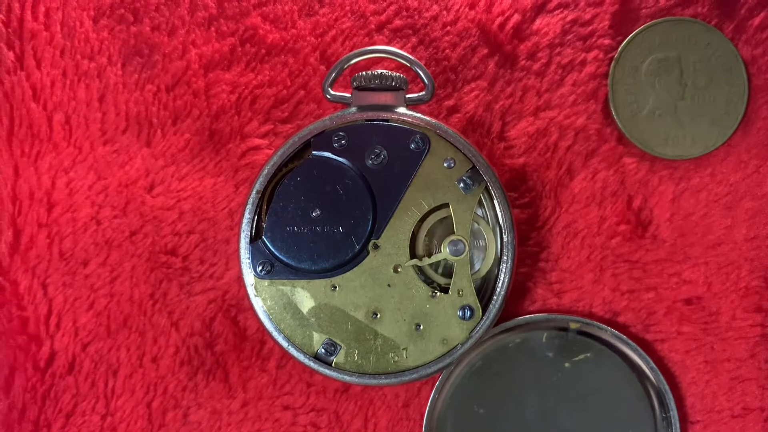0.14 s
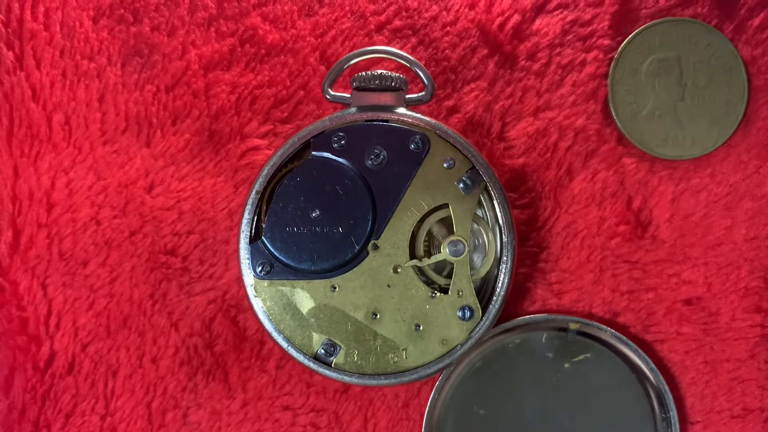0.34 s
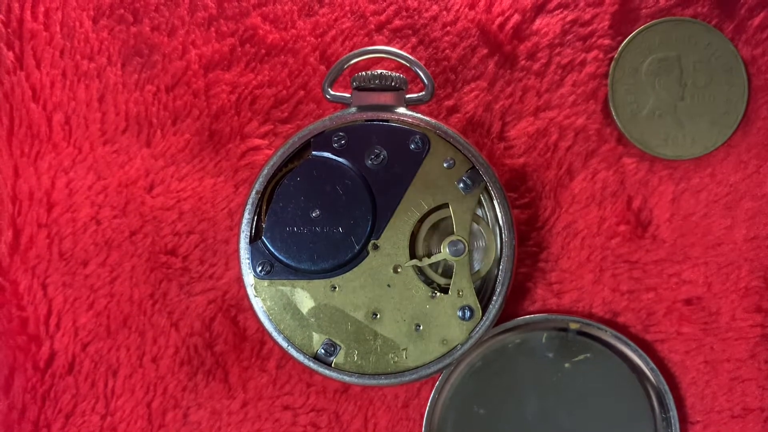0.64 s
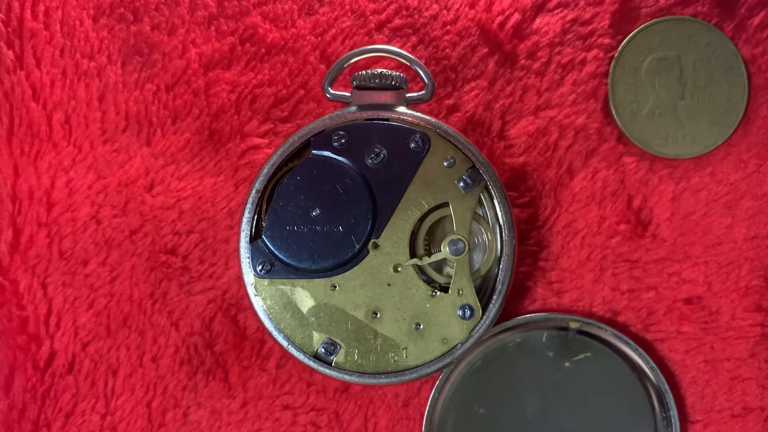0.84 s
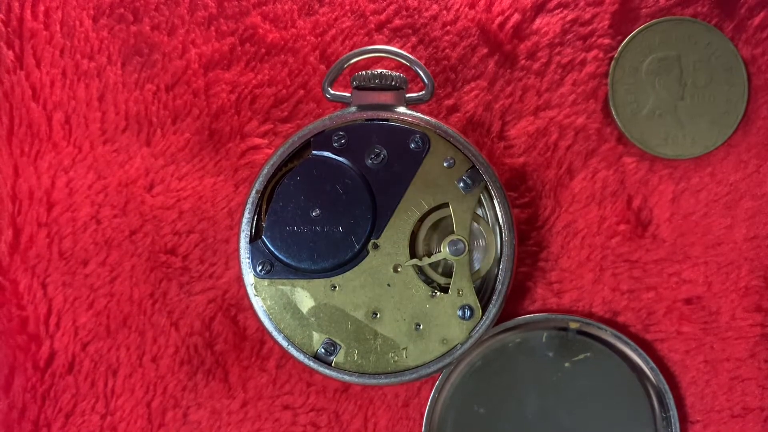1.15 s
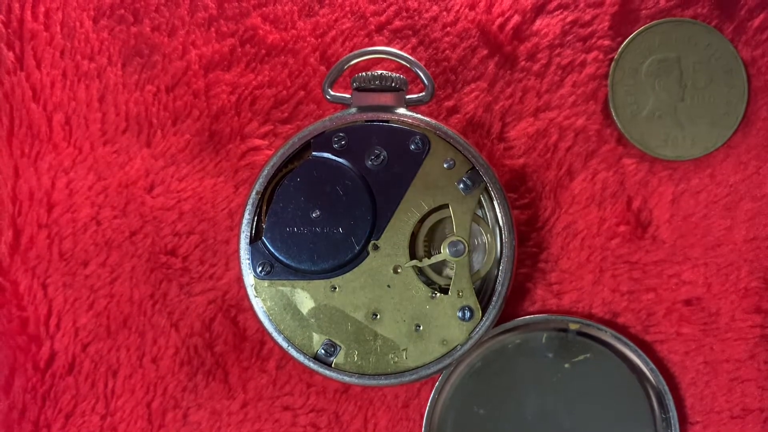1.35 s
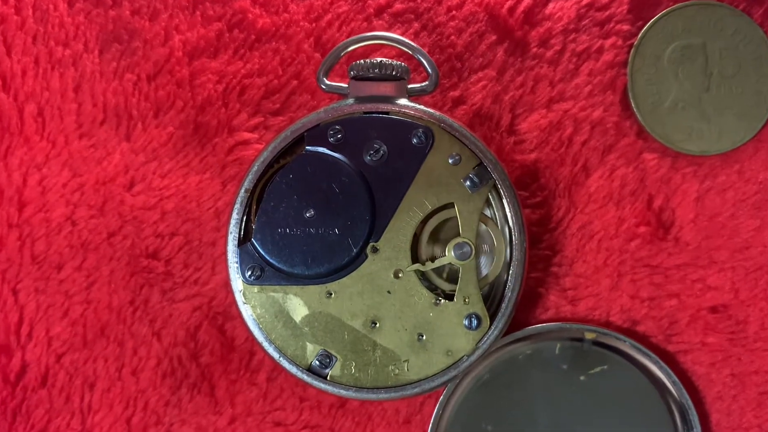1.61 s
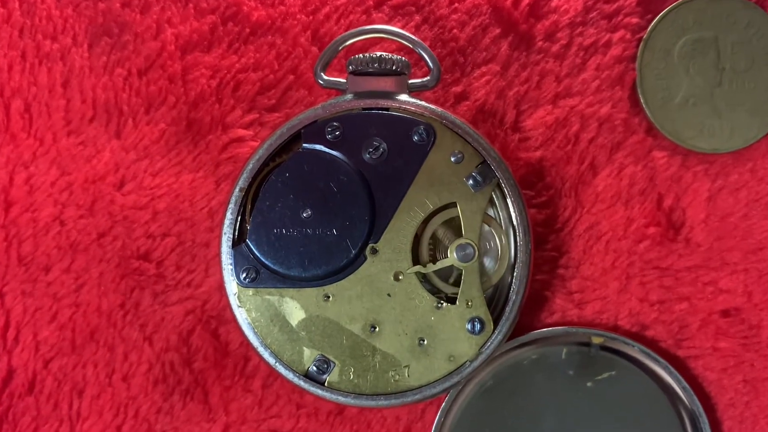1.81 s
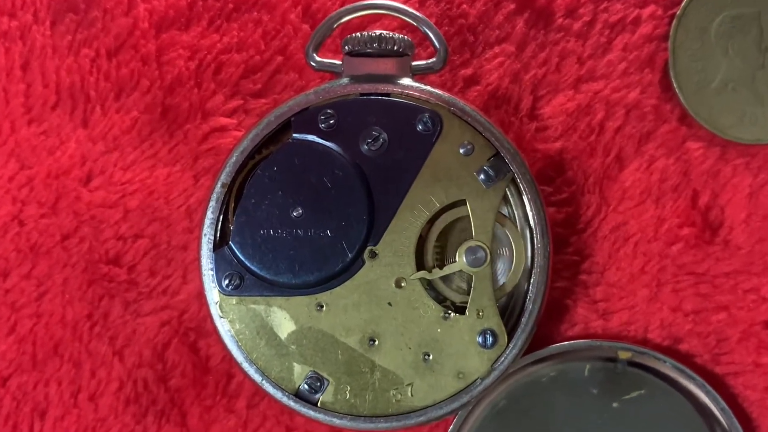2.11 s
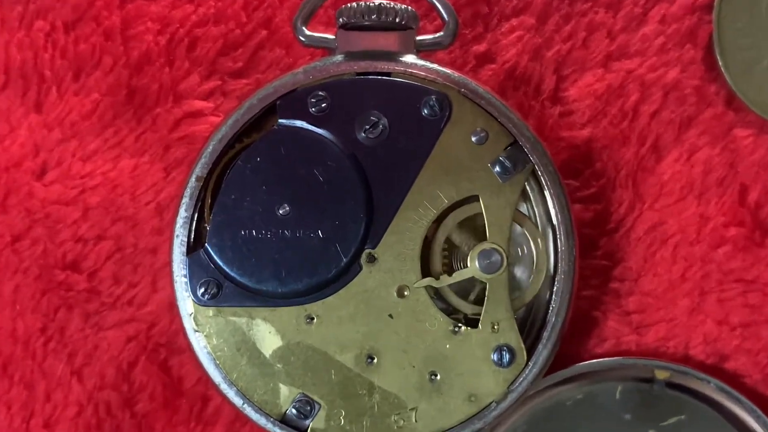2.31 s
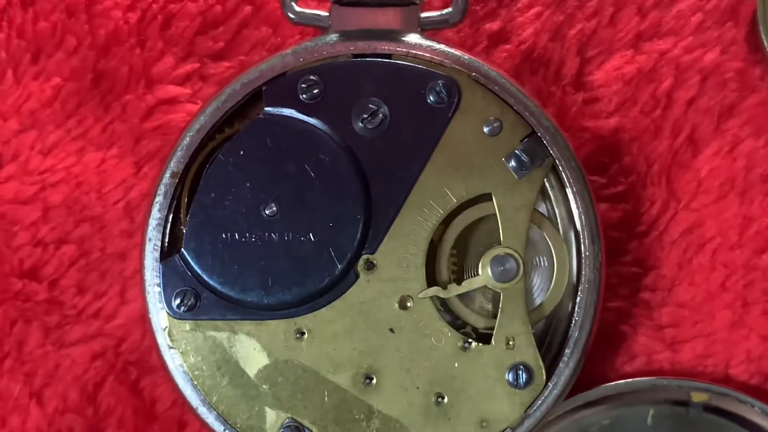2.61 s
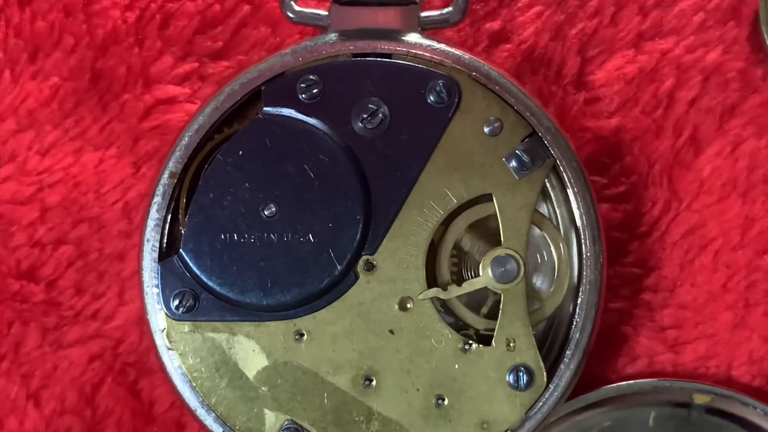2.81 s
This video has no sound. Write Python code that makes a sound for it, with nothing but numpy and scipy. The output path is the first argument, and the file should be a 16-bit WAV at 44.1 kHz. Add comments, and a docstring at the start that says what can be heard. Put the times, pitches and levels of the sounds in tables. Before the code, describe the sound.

Fast, tiny metallic tick-tock of a pocket watch movement, with faint hiss and distant engines behind

```python
"""An open pocket watch on plush cloth, heard close: impacts in its escapement ring steel modes, tick-tock,
four beats a second, with fainter contacts around each beat and a hairspring ping before each tock.
Behind it, filtered noise makes the room's hiss and a low traffic rumble; sines make an appliance hum,
swelling tones of distant traffic, an engine that speeds up and another that passes with falling pitch."""
import sys
import numpy as np
from scipy import signal
from scipy.fft import rfft, irfft, next_fast_len
from scipy.io import wavfile
from scipy.ndimage import uniform_filter1d, map_coordinates

SR = 44100
rng = np.random.default_rng(int(sys.argv[2]) if len(sys.argv) > 2 else 0)


def unload_audio(sound):
    """Save the sound as a 16-bit wav file, at the path given as the first command line argument."""
    columns = np.transpose(np.atleast_2d(sound))
    # keep every value between -1 and 1, then stretch to whole-number steps
    steps = np.round(np.clip(columns, -1, 1) * 32767)
    wavfile.write(sys.argv[1], SR, steps.astype(np.int16))


N = 130536
SWING_S = 0.5008  # one full swing of the balance: a tick and a tock


def amp(db):
    """Decibel law: level to amplitude ratio."""
    return 10 ** (np.asarray(db) / 20)


def unit(x):
    """Normalisation to a root-mean-square value of 1."""
    return x / np.sqrt(np.mean(x ** 2) + 1e-20)


def along(points, hz):
    """Interpolation of (frequency, value) points on a logarithmic frequency axis."""
    f, v = np.transpose(points)
    return np.interp(np.log(hz + 1), np.log(f + 1), v)


def curves(rows):
    """Linear interpolation in time: one value per sample for each column after the first."""
    s, *columns = np.transpose(rows)
    return [np.interp(np.arange(N) / SR, s, column) for column in columns]


def wobble(rate):
    """Slow random modulation: a smooth curve through `rate` random knots a second."""
    knots = rng.standard_normal(int(N * rate / SR) + 4)
    return map_coordinates(knots, [np.arange(N) * rate / SR])


def filtered(x, response):
    """Linear filtering: the spectrum times a complex response of frequency."""
    m = next_fast_len(N + SR // 2)
    return irfft(rfft(x, m) * response(np.fft.rfftfreq(m, 1 / SR)), m)[..., :N]


def tone(hz, waver_db):
    """Frequency modulation: phase is the integral of frequency; the level of the sine wavers about rms 1."""
    cycles = np.cumsum(hz + np.zeros(N)) / SR + rng.random()
    return np.sqrt(2) * amp(waver_db * wobble(7.38)) * np.sin(2 * np.pi * cycles)


def add(track, s, sound):
    """Superposition: a stereo sound joins the track at time s."""
    i = round(s * SR)
    if 0 <= i < N:
        track[:, i:i + sound.shape[1]] += sound[:, :N - i]


# likeness of the two channels of the noise: f/Hz, correlation [0-1]
LIKENESS = [(60, 0.9), (270, 0.79), (450, 0.41), (2000, 0.18), (5500, 0.067), (9300, 0.038), (11000, 1),
            (13500, 0.99), (15000, 0.67)]
# balance of the two channels of the noise: f/Hz, left over right level/dB
BALANCE = [(60, 1), (140, 1.5), (300, -1.5), (500, -2.5), (770, 2), (1170, -1), (2740, -1.5), (5500, 1.5),
           (7500, 1.5), (8300, 12), (9300, 6.5), (10400, 2.5), (15000, -1)]


def diffuse_noise(spectrum, patchy_db, size):
    """Partial coherence: mid and side noises share the power by the channels' correlation; overall rms is 1."""
    z = signal.stft(rng.standard_normal((2, N)), nperseg=size)[2]
    # a smoothed random gain over frequency and time makes the noise patchy
    field = rng.standard_normal(z.shape[1:])
    field = uniform_filter1d(field, size=3, axis=0)
    field = uniform_filter1d(field, size=3, axis=1)
    noise = signal.istft(z * amp(patchy_db * unit(field)), nperseg=size)[1][:, :N]

    def mid_side_response(hz):
        angle = np.arccos(np.clip(along(LIKENESS, hz), -1, 1)) / 2
        return amp(along(spectrum, hz)) * [np.cos(angle), np.sin(angle)]

    mid, side = filtered(noise, mid_side_response)
    left_right = np.array([mid + side, mid - side])
    return unit(filtered(left_right, lambda hz: amp(np.outer([.5, -.5], along(BALANCE, hz)))))


# shape of the hiss spectrum: f/Hz, relative level/dB per Hz
HISS_SPECTRUM = [(240, -10), (400, -2), (482, -3), (792, -1.5), (1020, -9), (1360, -3.5), (1590, -5.5),
                 (1770, -3), (3250, -8), (4570, -10.5), (5430, -14.5), (6240, -10.5), (7170, -18),
                 (8380, -13), (10500, -17), (13500, -17), (14500, -21.5), (15700, -20), (15800, -43),
                 (16400, -76)]
HISS_DB = -58  # before the swell and the wavering
SWELL_AFTER_S, SWELL_WIDTH_S, SWELL_DB = 0.245, 0.04, 2.2  # time after the tick, width, height


def hiss():
    """Broadband noise under periodic amplitude modulation: the room's hiss swells a little around each tock."""
    from_swell = np.arange(N) / SR - TICKS[0][0] - SWELL_AFTER_S
    from_swell = (from_swell + SWING_S / 2) % SWING_S - SWING_S / 2
    swell_db = SWELL_DB * np.exp(-(from_swell / SWELL_WIDTH_S) ** 2)
    level_db = HISS_DB + swell_db + 0.85 * wobble(5.76)
    return amp(level_db) * diffuse_noise(HISS_SPECTRUM, patchy_db=2.04, size=512)


# shape of the traffic rumble's spectrum: f/Hz, relative level/dB per Hz
RUMBLE_SPECTRUM = [(15, -27), (30, -19), (70, -4), (105, -2), (135, -2.5), (160, -6.5), (200, -6.5),
                   (260, -7), (339, -14), (404, -13.5), (500, -38), (1100, -120)]
# its course before wavering: t/s, level/dB
RUMBLE_COURSE = [(0, -55.5), (.5, -56), (.9, -55), (1.3, -58), (1.8, -59.5), (2.3, -57), (2.96, -57.5)]


def rumble():
    """Low-frequency noise under slow amplitude modulation: traffic that comes and goes."""
    level_db, = curves(RUMBLE_COURSE)
    level_db = level_db + 2.4 * wobble(4.73)
    return amp(level_db) * diffuse_noise(RUMBLE_SPECTRUM, patchy_db=2.5, size=8192)


# appliance hum before wavering and channel balance: f/Hz, rms level/dB
HUM_TONES = [(48.4, -66), (112.3, -58), (120.02, -60.5)]
IN_STEP_S = 0.157  # all hum phases are zero here, so the two upper tones swell together


def hum():
    """Beating: steady sines close in frequency drift in and out of step, each wavering in level."""
    t = np.arange(N) / SR - IN_STEP_S
    out = np.zeros(N)
    for hz, db in HUM_TONES:
        out += np.sqrt(2) * amp(db + 2.3 * wobble(2.98)) * np.sin(2 * np.pi * hz * t)
    return out


# low tones of distant traffic, before wavering and balance: middle t/s, half length t/s, f/Hz, rms level/dB
TRAFFIC_TONES = [(0.07, 0.12, 247, -61.5), (0.29, 0.46, 186.3, -64), (.5, 0.11, 134, -64.5),
                 (0.64, 0.26, 268.2, -65), (0.865, 0.19, 138, -61), (0.952, 0.125, 210, -62),
                 (0.99, 0.21, 105.9, -59), (2.31, 0.27, 262.5, -65), (2.796, 0.25, 249.3, -64.5),
                 (2.804, 0.24, 186.4, -66)]


def moans():
    """Gaussian envelope: each tone swells and fades smoothly."""
    t = np.arange(N) / SR
    out = np.zeros(N)
    for middle_s, half_s, hz, db in TRAFFIC_TONES:
        out += amp(db) * np.exp(-((t - middle_s) / half_s) ** 2) * tone(hz, waver_db=1.5)
    return out


# course of the passing engine's lower tone, before wavering and balance: t/s, f/Hz, level/dB
PASSING_COURSE = [(1.0, 88.7, -75), (1.3, 90.7, -57.5), (1.5, 86.92, -58), (1.9, 79.8, -58),
                  (2.15, 76.7, -55), (2.4, 74.4, -87)]


def passing_engine():
    """Frequency glide: two tones in a fixed ratio fall together as the engine passes."""
    hz, db = curves(PASSING_COURSE)
    upper = amp(-0.5) * tone(1.33 * hz, waver_db=2.5)
    return amp(db) * (tone(hz, waver_db=0.5) + upper)


# course of the nearing pitch and level, before orders, wavering and balance: t/s, firing f/Hz, level/dB
ENGINE_COURSE = [(1.1, 55, -67), (1.45, 57.26, -55), (1.599, 57.13, -59.5), (1.9, 56.8, -56.5),
                 (2.39, 59.65, -58), (2.55, 59.98, -49), (2.96, 62.7, -42.5)]
# engine orders: multiple of the firing frequency, relative level/dB
ORDERS = [(1, 0), (1.5, -14), (2.5, -16)]


def speeding_engine():
    """Engine orders: tones at fixed multiples of a firing frequency that rises overall and swells."""
    start_s, start_hz, _ = ENGINE_COURSE[0]
    fade_in = (start_s - 0.3, start_hz, -80)
    hz, db = curves([fade_in] + list(ENGINE_COURSE))
    return amp(db) * sum(amp(order_db) * tone(k * hz, waver_db=1.0) for k, order_db in ORDERS)


def drones():
    """Amplitude panning: all tonal background sounds share one balance, stronger on the left."""
    mono = hum() + moans() + passing_engine() + speeding_engine()
    return mono * amp([[1.4], [-1.4]])


# hairspring modes: f/Hz, relative level/dB, 60 dB decay t/s
SPRING_MODES = [(4900, 0, .021), (6200, 3, .012)]
# scale of the ping in each swing, in order: level/dB
PING_LEVELS = [-37, -34.5, -34, -34.5, -34.5, -34.5]
PING_AFTER_S, PING_RISE_S = 0.1915, 0.003  # start after the tick, time constant of the rise


def hairspring():
    """Modal decay: the spring's two modes swell quickly and die, before each tock."""
    out = np.zeros((2, N))
    t = np.arange(SR // 20) / SR
    rise = (1 - np.exp(-t / PING_RISE_S)) ** 2
    for (tick_s, _), ping_db in zip(TICKS, PING_LEVELS):
        ring = sum(amp(db - 60 * t / t60) * np.sin(2 * np.pi * (hz * t + rng.random()))
                   for hz, db, t60 in SPRING_MODES)
        add(out, tick_s + PING_AFTER_S, amp(ping_db) * np.tile(ring * rise, (2, 1)))
    return out


def decay(t, db, t60_s):
    """Exponential decay: falls 60 dB in t60_s; its total energy is set by db."""
    return amp(db - 60 * t / t60_s) / np.linalg.norm(amp(-60 * t / t60_s))


def strike(hz, db, t60, length_s):
    """Modal excitation: a chatter of steel on steel rings the modes; case, table and room answer diffusely."""
    t = np.arange(SR // 40) / SR
    phase = 2 * np.pi * (hz[:, None] * t + rng.random((len(hz), 1)))
    rise = 1 - np.exp(-t / 0.0004)  # time constant in s
    rings = amp(db[:, None] - 60 * t / t60[:, None]) * np.sin(phase) * rise
    u = np.clip(t[:SR // 70] / length_s, 0, 1)
    chatter = rng.standard_normal((1, len(u))) * np.sin(np.pi * u) ** 2
    rung = signal.fftconvolve(rings, chatter, axes=1)
    # each mode keeps the energy it had before the chatter
    gain = np.linalg.norm(rings, axis=1) / np.linalg.norm(rung, axis=1)
    direct = np.sum(rung * gain[:, None], axis=0)

    t = np.arange(SR // 5) / SR
    envelope = np.hypot(decay(t, -9, 0.04), decay(t, -5, 0.17))  # early echo and room tail
    response = rng.standard_normal((2, len(t))) * envelope
    response[:, 0] = amp([0.4, -0.4])  # direct sound, 0.8 dB stronger on the left
    return signal.fftconvolve(direct[None], response, axes=1)


# frequencies of the five mode regions: f/Hz
REGIONS = [4000, 5000, 6200, 8500, 12500]
# fainter contacts of one swing, before scatter and a common trim: t/s after the tick, length t/s,
# then relative level/dB of the modes in each of the five regions
SWING_CONTACTS = [(-.060, .003, -35, -9, -25, -13.5, -9.5), (-.0275, 0.0035, -10, -7, -22, -21, -8),
                  (-.008, 0.0047, -7.5, -28, -14, -12, -29), (.008, 0.012, -21, -11, -9, -15, -4.5),
                  (.022, .014, -35, -24, -16, -11, -6), (.044, .005, -28, -3, -22, -16, -3.5),
                  (.064, 0.013, -25, -21, -11, -17, -5), (.080, 0.022, -26, -24, -22, -14, -4),
                  (.096, .0045, -33, -28, -27, -15, -4), (.132, 0.0094, -32, -26, -6.5, -14, -13),
                  (.218, 0.012, -13, -11, -11, -13, -24), (.255, 0.0093, -9, -9, -12, -14, -6),
                  (.269, 0.016, -24, -18, -27, -26, -6), (.298, 0.0082, -23, -6, -12, -15, -0.5),
                  (.345, .0067, -28, -30, -28, -18, -2.5)]


def contacts():
    """Repeated weak impacts: every swing brings the same contacts, scattered in time, level and colour."""
    out = np.zeros((2, N))
    hz, tick_db, tock_db, t60 = np.transpose(MODES)
    level_db = np.mean(TICKS, 0)[1] + BEAT_DB
    tick_times = [s for s, _ in TICKS]
    # swings just outside the scene also reach into it
    for tick_s in tick_times + [tick_times[-1] + SWING_S, tick_times[0] - SWING_S]:
        for after_s, length_s, *region_db in SWING_CONTACTS:
            colour_db = (tick_db + tock_db) / 2 + along(list(zip(REGIONS, region_db)), hz)
            colour_db = colour_db + rng.normal(0, 3.4, len(hz))
            gain = amp(level_db - 1.0 + rng.normal(0, 2.7))
            start_s = tick_s + after_s + rng.normal(0, 0.001)
            add(out, start_s, gain * strike(hz, colour_db, t60, length_s))
    return out


# modes of the movement: f/Hz, relative tick level/dB, relative tock level/dB, 60 dB decay t/s
MODES = [(2100, -12.5, -13, 0.015), (4004, -5.5, -2.5, 0.012), (4630, -7.5, -3, 0.014),
         (5120, -9.5, -1, 0.019), (5620, -5.5, 1, 0.011), (6204, -3.5, -6.5, 0.011), (6990, -7, -3, 0.0075),
         (7720, -12.5, -0.5, 0.014), (8580, -3, 4, 0.0056), (9070, -4.5, -1.5, 0.0077),
         (9900, -2, -4, 0.0057), (10650, -11, -1, 0.0084), (11580, -9.5, -5, 0.0078),
         (12490, -11, -4.5, 0.0079), (14040, -11, -11, 0.0028), (13250, -8, -5, 0.0065),
         (14400, -3, -6, 0.0048)]
# ticks, before the common beat trim: t/s, level/dB
TICKS = [(0.185, -37.5), (0.6846, -37), (1.1851, -39), (1.6858, -40), (2.1861, -34.5), (2.687, -37.5)]
# tocks, before the common beat trim: t/s, level/dB
TOCKS = [(0.4298, -41), (0.9315, -40.5), (1.4316, -42.5), (1.9325, -43), (2.4316, -42.5), (2.9342, -41.5)]
BEAT_DB = -2  # common trim of the beats
TICK_S, TOCK_S = 0.0031, 0.003  # chatter lengths


def beats():
    """Selective modal excitation: tick and tock ring the same modes in different proportions."""
    out = np.zeros((2, N))
    hz, tick_db, tock_db, t60 = np.transpose(MODES)
    for times, colour_db, length_s in ((TICKS, tick_db, TICK_S), (TOCKS, tock_db, TOCK_S)):
        for s, db in times:
            add(out, s - 0.0008, amp(db + BEAT_DB) * strike(hz, colour_db, t60, length_s))
    return out


def scene():
    """Superposition of the room, the traffic and the watch."""
    background = hiss() + rumble() + drones()
    watch = hairspring() + contacts() + beats()
    return background + watch


# phase between the two channels: f/Hz, lag of the left [rad]
PHASE_LAG = [(20, 0), (150, .09), (400, .22), (4000, .3), (4800, 1.6), (5500, 3.7), (6200, 5.1),
             (6900, 6.4), (12000, 6.6), (15500, 7.3)]


def record(dry):
    """Phase difference and band limit: the channels turn apart by half the lag each; 16.4 kHz and up is cut."""
    def response(hz):
        return (hz < 16400) * np.exp(np.outer([-.5j, .5j], along(PHASE_LAG, hz)))
    return filtered(dry, response)


dry = scene()
out = record(dry)
unload_audio(out)
```